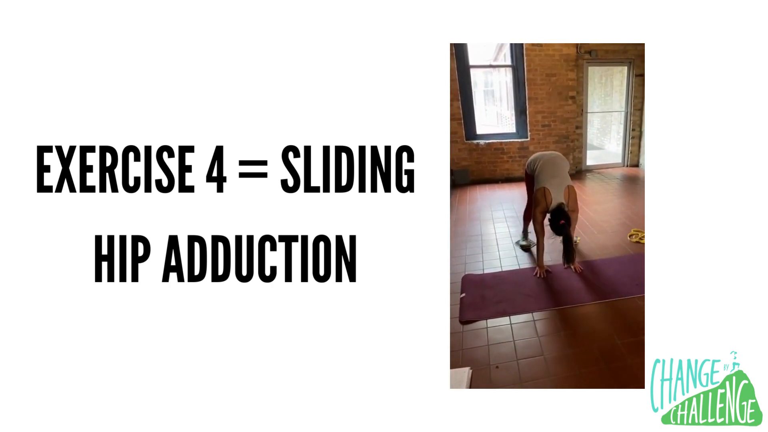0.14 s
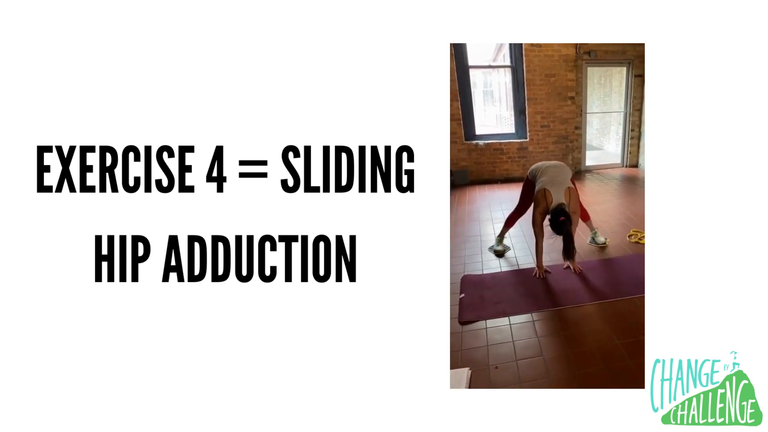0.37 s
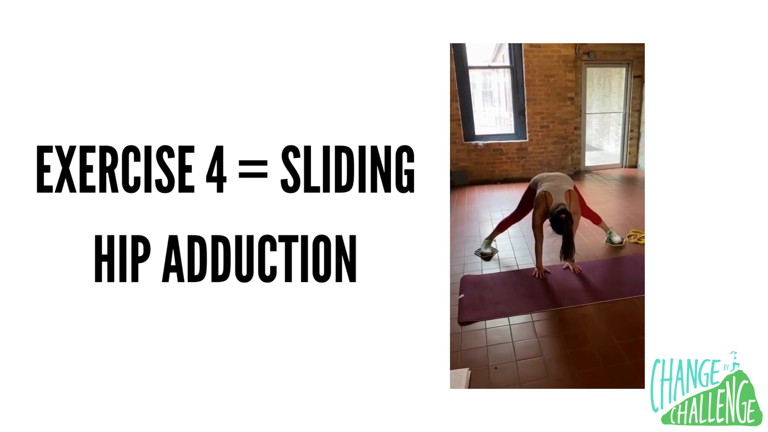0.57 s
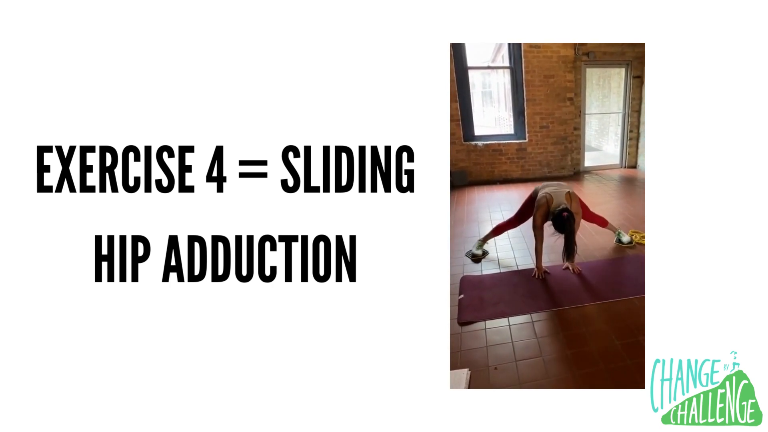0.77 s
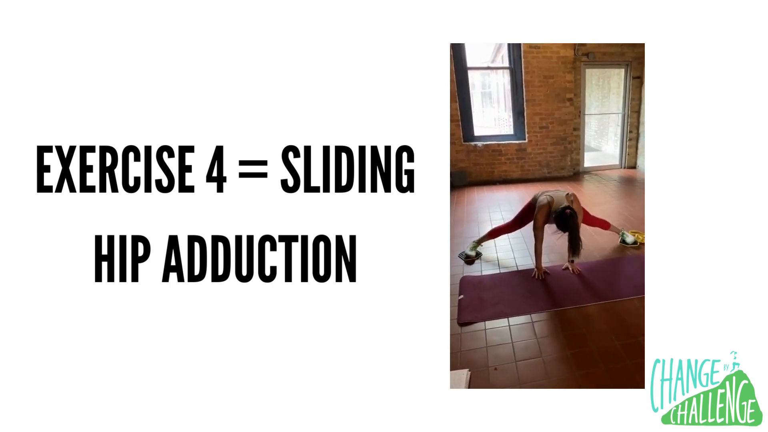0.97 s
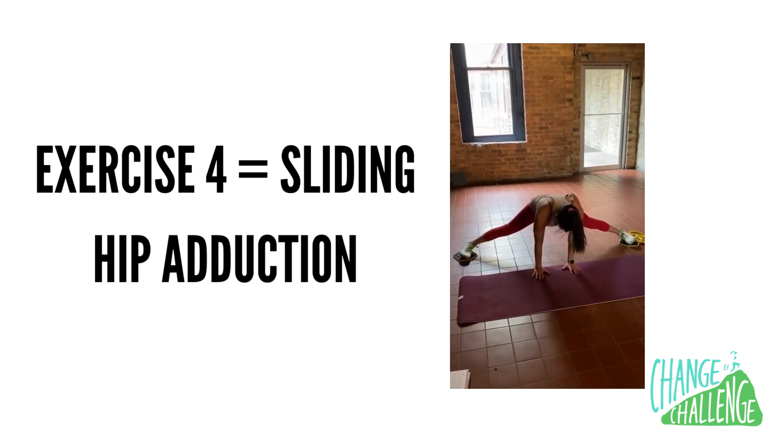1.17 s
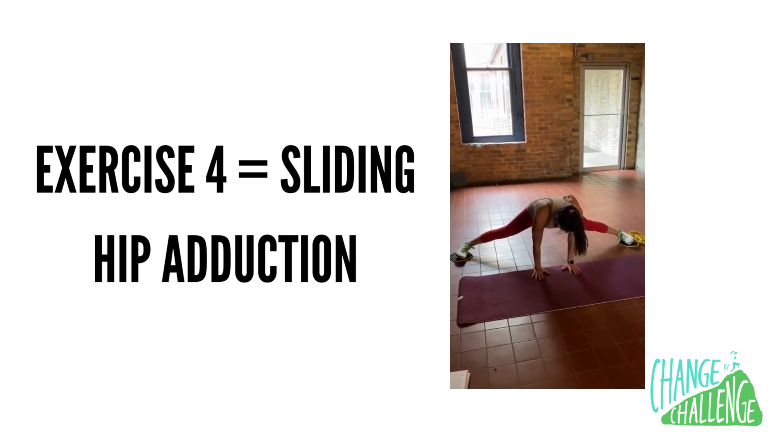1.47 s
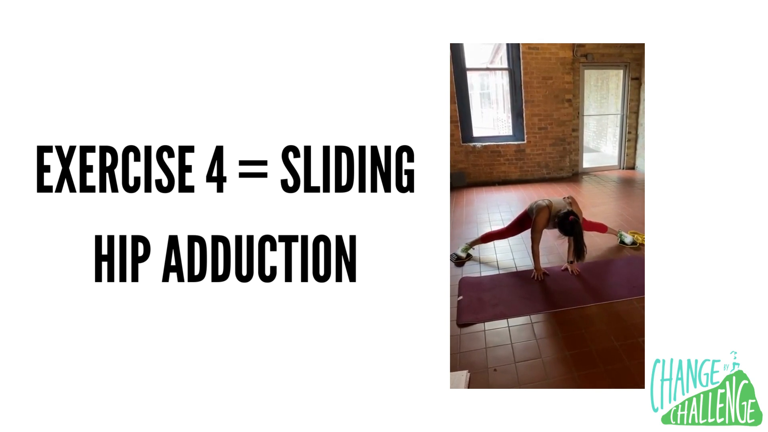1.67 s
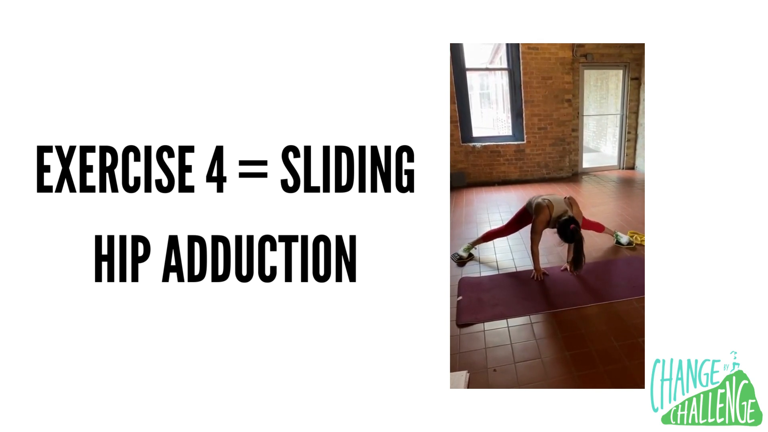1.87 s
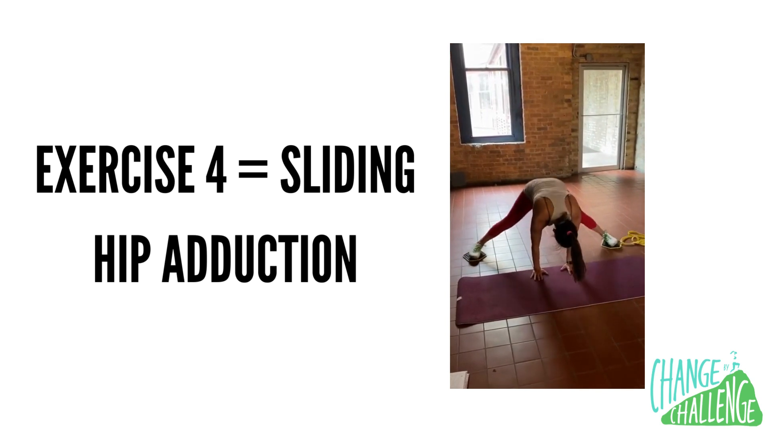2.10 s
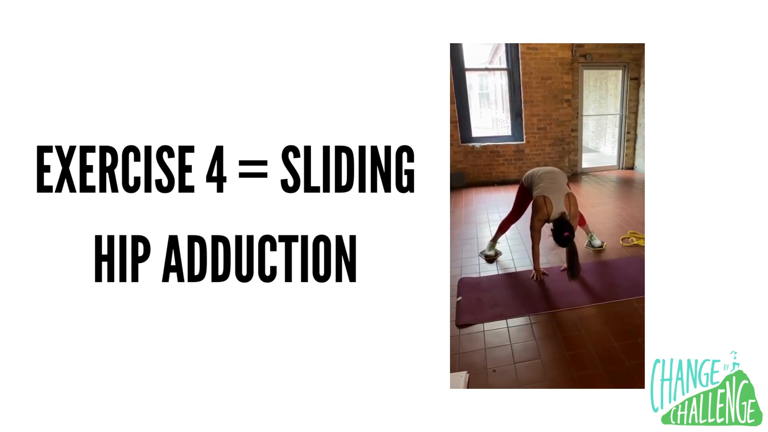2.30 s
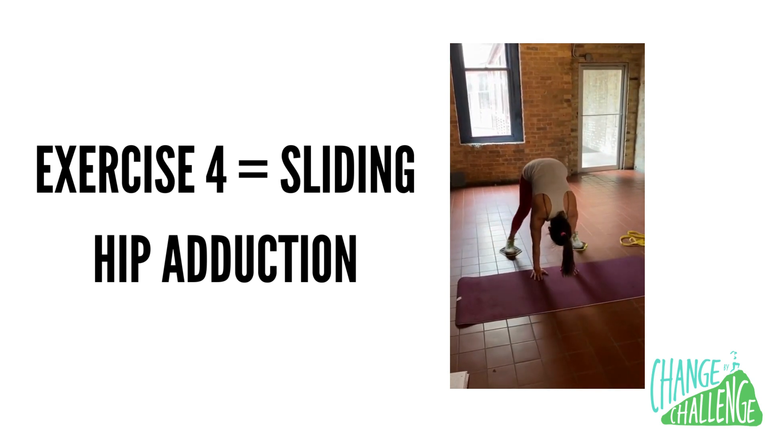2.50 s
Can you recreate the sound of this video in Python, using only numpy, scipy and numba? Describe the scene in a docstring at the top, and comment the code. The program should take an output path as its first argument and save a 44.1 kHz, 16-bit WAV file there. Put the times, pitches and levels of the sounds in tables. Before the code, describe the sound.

Exercise sliders break loose with a scuff at 0.1 seconds and swish apart over tiles, loudest from about 0.3 to 0.6. From 1 second they creep faintly, with tiny ticks of grit and soft thuds as weight shifts. After a brief pause, they slide back in at 1.9 seconds, growing louder until the end near 2.6. Ventilation rumbles and hums throughout in the hard-walled room.

```python
"""A stereo microphone close to a tiled floor, in a hard-walled room where ventilation rumbles and hums.
Two exercise sliders under a person's feet break loose with a scuff and glide apart; dense tiny slips
and grit excite the discs, which sound fuller the faster they go. From about 1 s they creep at the
widest stance, with ticks of grit and soft thuds as the weight shifts. Near 1.9 s they are drawn back in."""
import sys
import numpy as np
from scipy import signal
from scipy.fft import rfft, irfft, next_fast_len
from scipy.io import wavfile
from numba import njit

SR = 44100
rng = np.random.default_rng(int(sys.argv[2]) if len(sys.argv) > 2 else 0)


def generate_wav(sig):
    """Save sig (samples, or channels by samples) to the path in sys.argv[1] as 16-bit PCM at SR."""
    pcm = np.round(np.clip(np.atleast_2d(sig).T, -1, 1) * 32767).astype(np.int16)
    wavfile.write(sys.argv[1], SR, pcm)


N = 116865
TIME = np.arange(N) / SR


def undb(db):
    """Decibels to gain."""
    return 10 ** (np.asarray(db) / 20)


def unit(x):
    """Scale to rms 1."""
    return x / np.sqrt(np.mean(x ** 2))


def level_curve(points):
    """Gain over time through (seconds, dB) points."""
    return undb(np.interp(TIME, *np.array(points).T))


def colour(x, points):
    """Filter by (Hz, dB) points joined on a log-frequency axis."""
    hz, db = np.array(points, float).T
    size = next_fast_len(len(x) + SR // 2)
    f = np.maximum(np.fft.rfftfreq(size, 1 / SR), 1)
    gain = undb(np.interp(np.log(f), np.log(hz), db))
    return irfft(rfft(x, size) * gain, size)[:len(x)]


def ring(x, hz, width_hz):
    """One resonance, gain 1 at its centre."""
    return signal.lfilter(*signal.iirpeak(hz, hz / width_hz, fs=SR), x)


def steep_ring(x, hz, width_hz):
    """A resonance applied twice, for steeper skirts; rms 1."""
    return unit(ring(ring(x, hz, width_hz), hz, width_hz))


@njit
def moving_ring(x, hz, width_hz):
    """A resonance whose centre moves, gain 1 at the centre."""
    y, band, low = np.empty(len(x)), 0., 0.
    for i in range(len(x)):
        g, damping = np.tan(np.pi * hz[i] / SR), width_hz / hz[i]
        v = (band + g * (x[i] - low)) / (1 + g * (g + damping))
        band, low = 2 * v - band, low + 2 * g * v
        y[i] = damping * v
    return y


def wander(per_s):
    """Smooth random motion of rms 1, changing about per_s times a second."""
    f = np.fft.rfftfreq(N, 1 / SR)
    return unit(irfft(rfft(rng.standard_normal(N)) / (1 + (f / per_s) ** 4), N))


def stereo(mid, side):
    """Left and right from mid and side."""
    return np.array([mid + side, mid - side])


# The ventilation motor. Each row: frequency in Hz, rms level in dB.
MOTOR_HUM = [(120.1, -41), (240, -56.5), (360.2, -55.5), (601, -73)]
# The moving air. Each row: frequency in Hz, relative level in dB.
AIR_RUMBLE = [(20, -17.5), (33, -40), (48, 0.5), (58, -3.5), (71, 6), (82, -3.5), (105, -3.5), (150, -4.5),
              (205, -14.5), (260, -11.5), (330, -17.5), (460, -20.5), (560, -28.5), (1000, -34.5),
              (2000, -46.5), (4000, -54), (8000, -72), (15500, -75)]
# Its stereo width. Each row: frequency in Hz, side against mid in dB.
AIR_WIDTH = [(50, -90), (150, -38), (350, -11), (700, -2), (3000, -4)]
def ventilation(rumble_db=-38.5):
    """Room tone: low air rumble, with a steady motor hum in the centre."""
    mid, side = (undb(rumble_db) * unit(colour(rng.standard_normal(N), AIR_RUMBLE)) for _ in range(2))
    hum = sum(undb(db) * np.sqrt(2) * np.sin(2 * np.pi * (hz * TIME + rng.random()))
              for hz, db in MOTOR_HUM)
    return stereo(mid + hum, colour(side, AIR_WIDTH))


ROOM_T60_S = 0.38
def reflections(treble_t60_s=0.092, gap_s=0.0042):
    """The hard walls answer just after the direct sound; their treble dies sooner."""
    t = np.arange(SR // 2) / SR
    noise = rng.standard_normal(len(t))
    low = signal.sosfilt(signal.butter(1, 3500, fs=SR, output="sos"), noise)
    tail = low * undb(-60 * t / ROOM_T60_S) + (noise - low) * undb(-60 * t / treble_t60_s)
    tail *= t > gap_s
    return tail / np.linalg.norm(tail)


# Stereo width of the reflections. Each row: frequency in Hz, side against mid in dB.
REFLECTION_WIDTH = [(100, -35), (300, -8.5), (600, -2), (1100, -1), (2200, -1), (4500, 5), (6500, -7),
                    (9000, -2), (15000, 16)]
def room(x, wet_db=-6.5, move_s=.08):
    """Close up the direct sound leads; the reflections change every move_s as the feet travel."""
    hop, tails = int(move_s * SR), np.zeros((2, N + SR))
    for i in range(0, N, hop):
        for tail in tails:
            part = signal.fftconvolve(x[i:i + hop], reflections())
            tail[i:i + len(part)] += part
    wet = undb(wet_db)
    mid = x + wet * tails[0, :N]
    side = wet * colour(tails[1, :N], REFLECTION_WIDTH)
    return stereo(mid, side) / np.hypot(1, wet)


def dying_echo(start_db=-61):
    """At the outset the room still rings, dull and faint, from an earlier stroke."""
    envelope = undb(start_db - 60 * TIME / ROOM_T60_S)
    return envelope * steep_ring(rng.standard_normal(N), hz=1900, width_hz=2500)


# Shifts of weight. Each row: start in seconds, peak level in dB.
WEIGHT_SHIFTS = [(0.929, -33), (1.268, -28.5), (1.914, -29)]
def floor_thuds(hz=66.5, decay_s=.008):
    """A low, heavily damped bump comes through the floor as the weight shifts."""
    out = np.zeros(N)
    for start, db in WEIGHT_SHIFTS:
        age = np.maximum(TIME - start, 0)
        bump = np.sin(2 * np.pi * hz * age) * age * np.exp(-age / decay_s)
        out += undb(db) * bump / np.abs(bump).max()
    return out


# Single grains under the discs. Each row: start in seconds, relative peak level in dB.
GRAINS = [(0.896, -37), (0.988, -39), (1.012, -41), (1.104, -45), (1.244, -44.5), (1.3276, -45),
          (1.387, -44), (1.4175, -50), (1.452, -47), (1.546, -52), (1.584, -54), (1.908, -45), (2.071, -37),
          (2.172, -33)]
def grit_ticks(decay_s=0.0034):
    """Grains of grit give way with a tiny, bright crack."""
    out = np.zeros(N)
    crack = steep_ring(rng.standard_normal(N), hz=7400, width_hz=7500)
    for start, db in GRAINS:
        grain = crack * (TIME >= start) * np.exp(-np.abs(TIME - start) / decay_s)
        out += undb(db) * grain / np.abs(grain).max()
    return out


def slips(grit_per_s=2500, spread_db=2.5, grit_db=-3):
    """Friction: countless micro-slips, with grains of grit of uneven size among them."""
    kicks = (rng.random(N) < grit_per_s / SR) * rng.choice([-1, 1], N)
    sizes = undb(spread_db * np.minimum(rng.exponential(size=N), np.pi))
    return unit(rng.standard_normal(N) + undb(grit_db) * unit(kicks * sizes))


# Joints crossed. Each row: middle of the scrape in seconds, relative level in dB.
TILE_JOINTS = [(0.14, -47), (0.215, -42), (0.285, -45), (0.939, -48.5), (2.32, -46), (2.47, -39.5),
               (2.61, -42)]
def joint_scrapes(half_width_s=0.034):
    """A short, dull swell of scraping as a disc rides over a tile joint."""
    envelope = sum(undb(db) * np.exp(-((TIME - s) / half_width_s) ** 2) for s, db in TILE_JOINTS)
    return envelope * steep_ring(slips(), hz=883, width_hz=880)


def scuff(start_s=0.107, attack_s=0.015, decay_s=0.06, gain_db=-36):
    """Sticking friction lets go and briefly rings the hollow of the discs."""
    age = np.maximum(TIME - start_s, 0)
    envelope = np.minimum(age / attack_s, 1) * np.exp(-age / decay_s)
    return undb(gain_db) * envelope * unit(ring(slips(), hz=2150, width_hz=530))


# The hollow under the discs. Each row: time in seconds, centre in Hz, dB against the rubbing.
HOLLOW_PATH = [(0.17, 2330, -6), (0.25, 1770, -9.5), (0.33, 1900, -12), (0.39, 2320, -19), (0.45, 1840, -6),
               (0.49, 1710, -20), (0.54, 1560, -7), (0.61, 2010, -8.5), (0.72, 2200, -7), (0.85, 2070, -16),
               (0.97, 1850, -10), (1.15, 1875, -13), (2.0, 1700, -27), (2.24, 1690, -10),
               (2.32, 1670, -7.5), (2.38, 2160, -6), (2.44, 1820, -12), (2.5, 1740, -10),
               (2.545, 1770, -3.5), (2.61, 1800, -5.5), (2.65, 1800, -5)]
# Their rasping upper resonance. Each row: time in seconds, dB against the rubbing.
RASP_LEVEL = [(0.13, -2.5), (0.25, -6.5), (0.35, -12), (0.43, -3.5), (0.52, -10.5), (0.57, -7), (0.7, -9),
              (0.85, -10), (1.0, -9.5), (1.98, -22), (2.14, -3.5), (2.26, -11), (2.37, -4.5), (2.46, -8.5),
              (2.65, -2.5)]
def hollow(width_hz=680.):
    """Slips ring the hollow, which changes as the feet press and tilt, and a rasp above it."""
    seconds, hz, db = np.array(HOLLOW_PATH).T
    centre = np.interp(TIME, seconds, hz)
    cavity = moving_ring(slips(), centre, width_hz)
    cavity = unit(moving_ring(cavity, centre, width_hz))
    rasp = steep_ring(slips(), hz=2430, width_hz=1200)
    return undb(np.interp(TIME, seconds, db)) * cavity + level_curve(RASP_LEVEL) * rasp


# Colours of a fast glide and a slow creep. Each row: frequency in Hz, relative level in dB.
GLIDE_COLOUR = [(100, -47), (250, -9.5), (450, -14), (800, -11.5), (1050, -11), (1300, -5), (1600, -4),
                (2300, -6.5), (2900, -6.5), (3500, -1.5), (4300, -3.5), (5400, -2), (6800, -8), (8200, -5),
                (9500, -13), (12000, -20.5), (13200, -29), (15500, -30.5)]
CREEP_COLOUR = [(100, -5), (250, -4), (450, 1.5), (800, 3), (1300, -2.5), (1800, 1.5), (2230, 3),
                (2650, 0.5), (3200, -6.5), (4200, -10), (5300, -2.5), (6800, -11.5), (8200, -9.5),
                (9500, -17.5), (12000, -19.5), (15500, -29.5)]
# Brightness of the rubbing. Each row: time in seconds, treble gain in dB.
TREBLE_LEVEL = [(0.12, 3), (0.23, -2), (0.35, -3), (0.5, -1), (0.63, -3), (0.8, -3), (0.95, -3),
                (1.15, 1.5), (1.35, 4.5), (1.62, 1), (2.0, 1), (2.2, -0.5), (2.46, 1), (2.6, 0.5)]
def rubbing(gain, midpoint_db=-43.5, blend_db=18, judder_db=.75, treble_hz=3500):
    """Juddering friction turns from creep to glide colour as the stroke gains speed and level."""
    glide_share = .5 + .5 * np.tanh((20 * np.log10(gain + 1e-9) - midpoint_db) / blend_db)
    force = slips() * undb(judder_db * wander(per_s=60))
    glide, creep = unit(colour(force, GLIDE_COLOUR)), unit(colour(force, CREEP_COLOUR))
    rub = glide_share * glide + (1 - glide_share) * creep
    treble = colour(rub, [(treble_hz / 2, -30), (treble_hz, 0)])
    return rub + (level_curve(TREBLE_LEVEL) - 1) * treble


def stroke(curve, fade_in_s=0.036, fade_out_s=0.074):
    """Gain of one stroke: it starts, follows its level curve and stops."""
    start, end = curve[0][0], curve[-1][0]
    fade = np.interp(TIME, [start - fade_in_s, start, end, end + fade_out_s], [0, 1, 1, 0])
    return level_curve(curve) * fade


# Loudness follows the speed of the feet. Each row: time in seconds, relative level in dB.
STROKE_OUT = [(0.09, -55.5), (0.113, -42), (0.2, -33.5), (0.27, -26.5), (0.35, -26), (0.53, -27.5),
              (0.6, -29), (0.7, -33.5), (0.82, -34.5), (0.96, -39), (1.1, -49), (1.19, -53), (1.3, -53.5),
              (1.42, -51), (1.52, -56.5), (1.62, -61.5), (1.7, -71)]
STROKE_IN = [(1.875, -64.5), (1.955, -46), (2.01, -43), (2.08, -39.5), (2.16, -38.5), (2.22, -36.5),
             (2.31, -32.5), (2.42, -34.5), (2.48, -32.5), (2.55, -32), (2.65, -32.5)]
# Narrow rings of the discs. Each row: centre in Hz, width in Hz, dB against the rubbing.
DISC_MODES = [(1552, 31, -27.5), (1850, 170, -19), (2200, 20, -40), (2410, 20, -39), (2980, 64, -16)]
def sliders(gain_db=-0.97, thin_tone_db=-25.5):
    """Near the microphone the discs rub and ring, out and back in."""
    gain = stroke(STROKE_OUT) + stroke(STROKE_IN)
    rub = rubbing(gain)
    rings = sum(undb(db) * unit(ring(slips(), hz, width)) for hz, width, db in DISC_MODES)
    # A thin, narrow tone near 6.9 kHz is also heard, rising and falling with the rubbing.
    thin_tone = undb(thin_tone_db) * unit(ring(slips(), hz=6912, width_hz=19))
    return undb(gain_db) * gain * (rub + hollow() + rings + thin_tone)


def scene(right_lead_db=0.5):
    """The sliders in the room, a touch right of centre, over floor thuds and ventilation."""
    discs = sliders() + scuff() + joint_scrapes() + grit_ticks() + dying_echo()
    balance = undb([[-right_lead_db / 2], [right_lead_db / 2]])
    return room(discs) * balance + floor_thuds() + ventilation()


# A small peak, then a narrow dip in the treble. Each row: frequency in Hz, gain in dB.
TREBLE_NOTCH = [(6000, 0), (6980, 5), (7250, -22), (7650, -3), (7950, -0.5), (8500, 0)]
def record(dry, top_hz=15500):
    """The treble has a narrow dip near 7.3 kHz, and the top is cut."""
    heard = np.array([colour(channel, TREBLE_NOTCH) for channel in dry])
    return signal.sosfilt(signal.ellip(10, .2, 80, top_hz, fs=SR, output="sos"), heard)


dry = scene()
out = record(dry)
generate_wav(out)
```